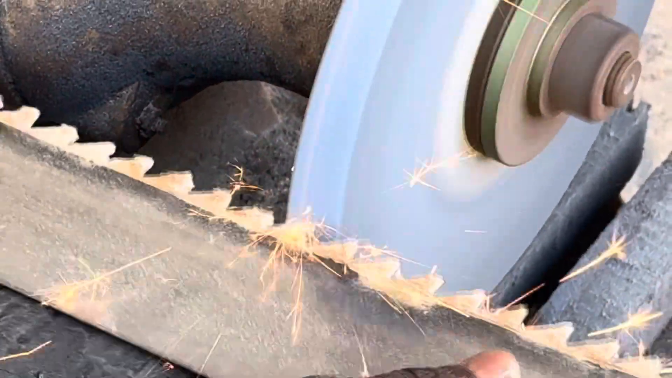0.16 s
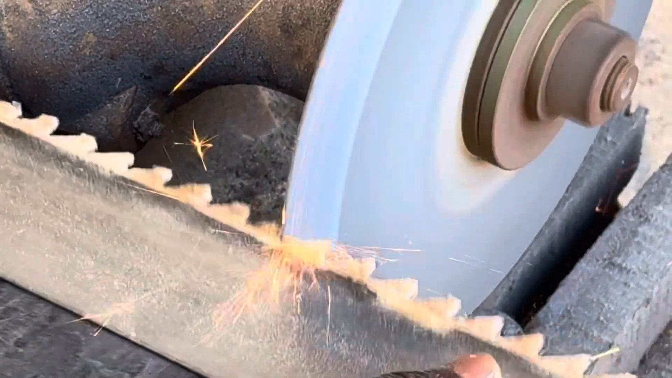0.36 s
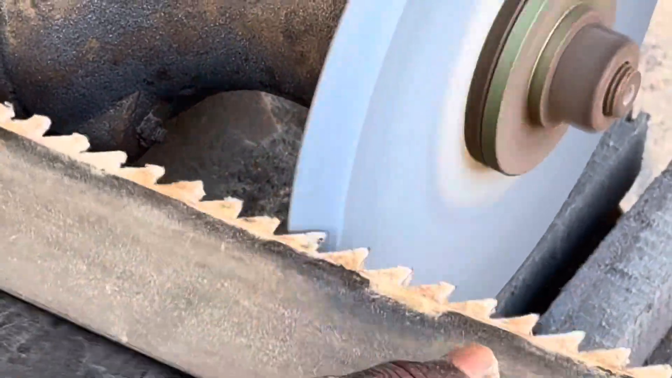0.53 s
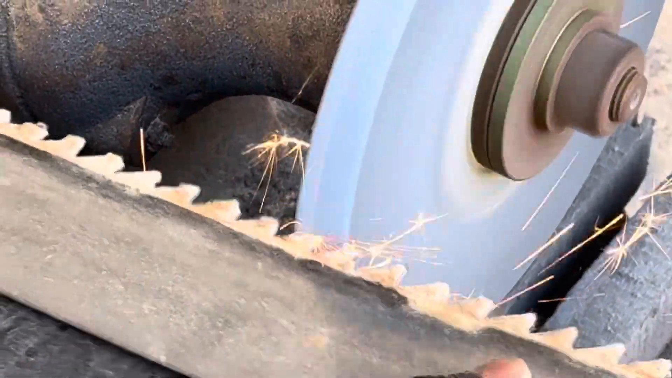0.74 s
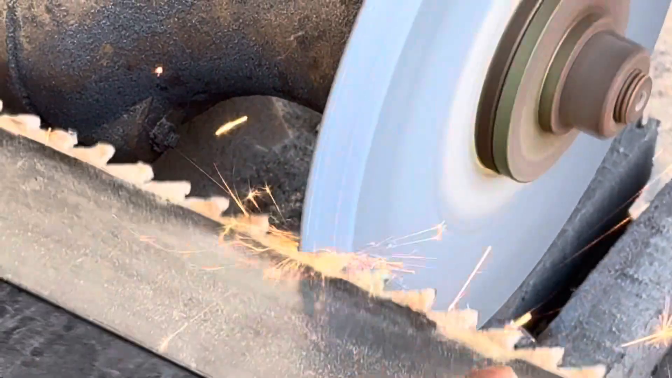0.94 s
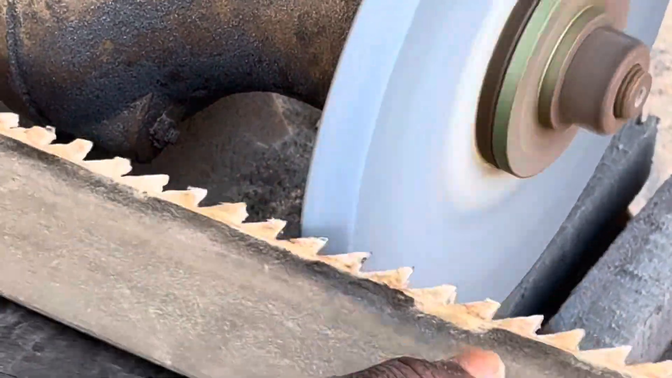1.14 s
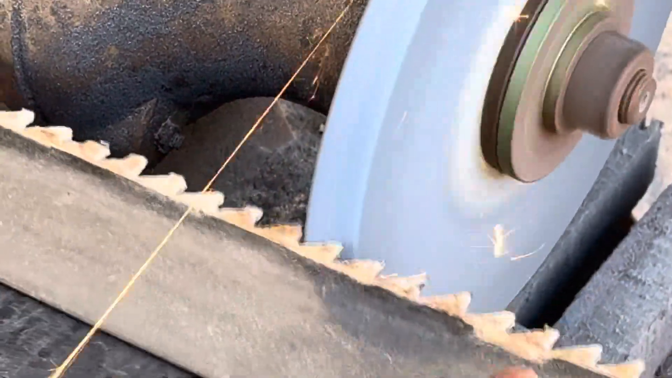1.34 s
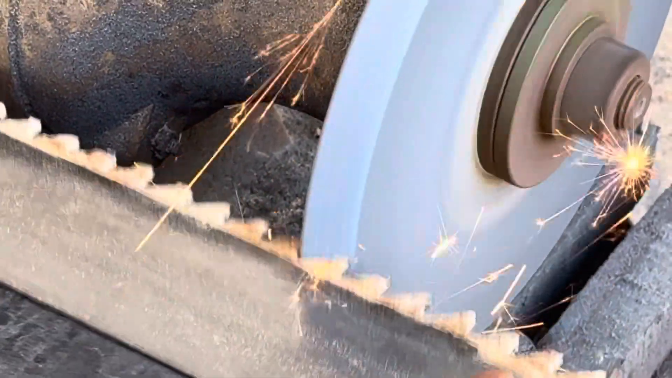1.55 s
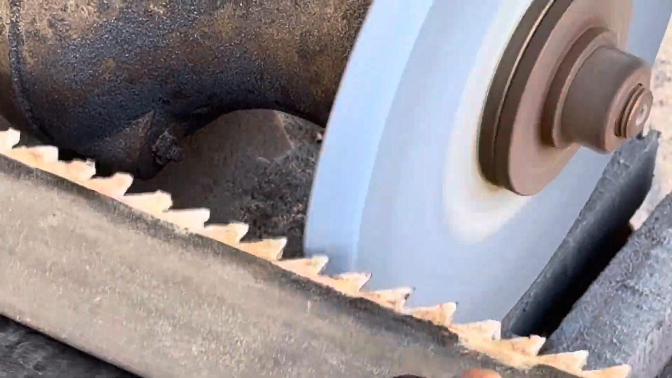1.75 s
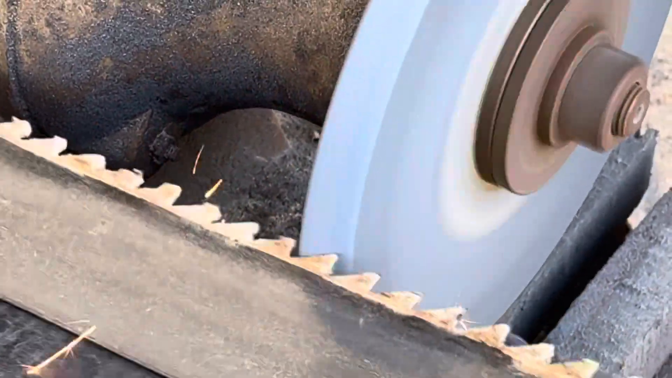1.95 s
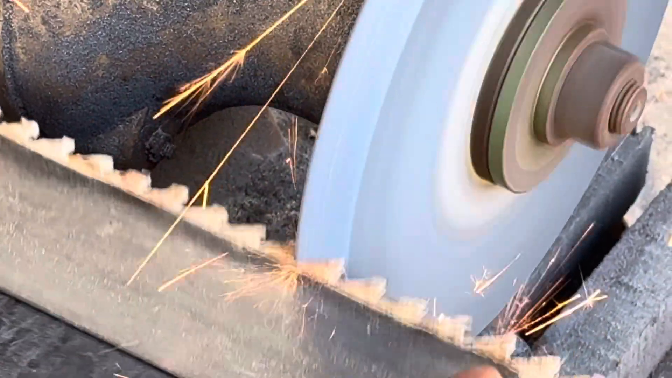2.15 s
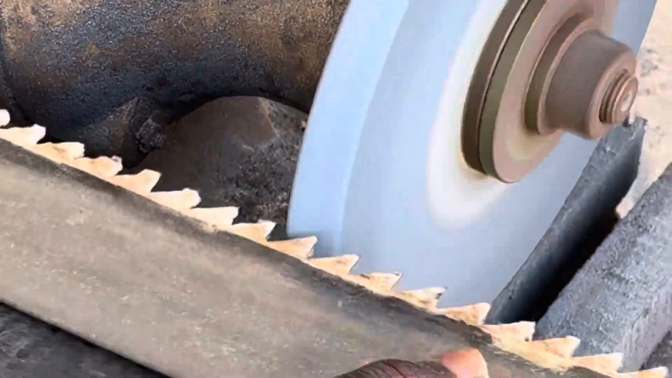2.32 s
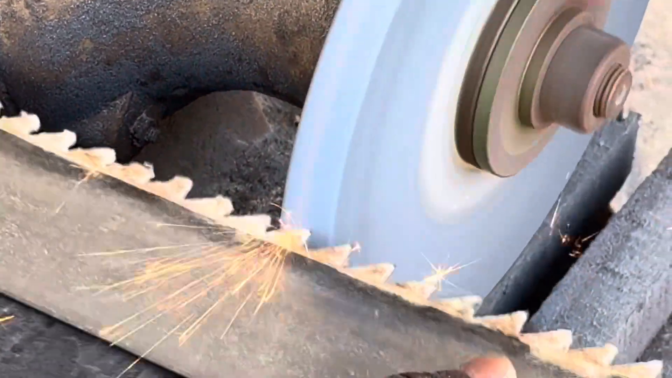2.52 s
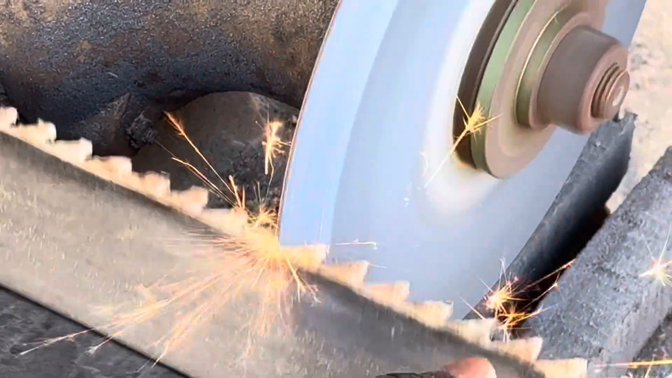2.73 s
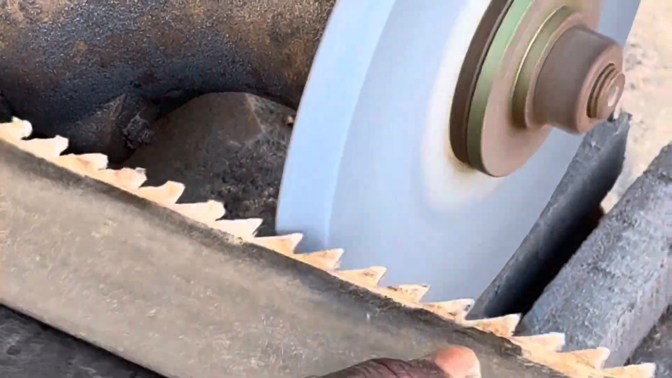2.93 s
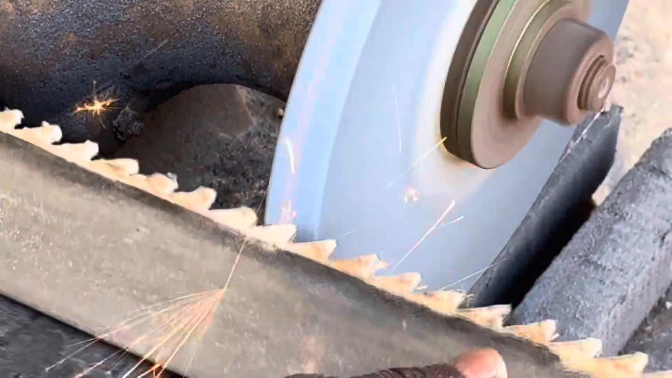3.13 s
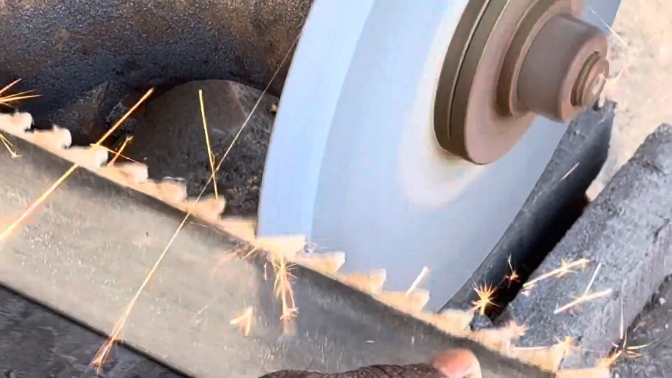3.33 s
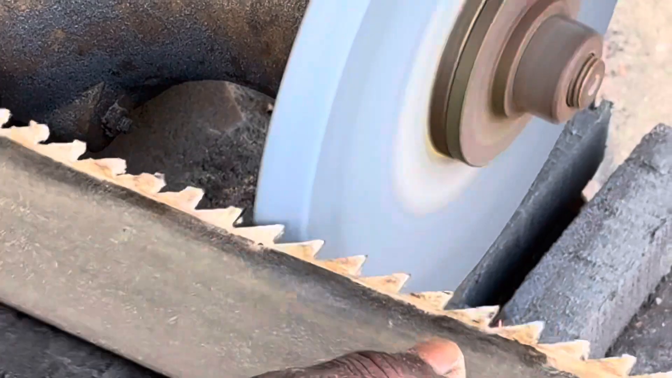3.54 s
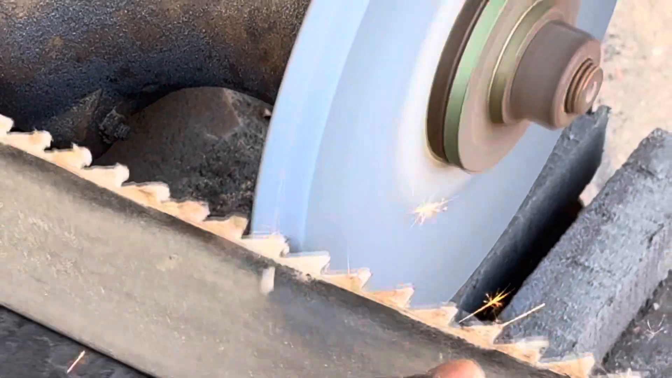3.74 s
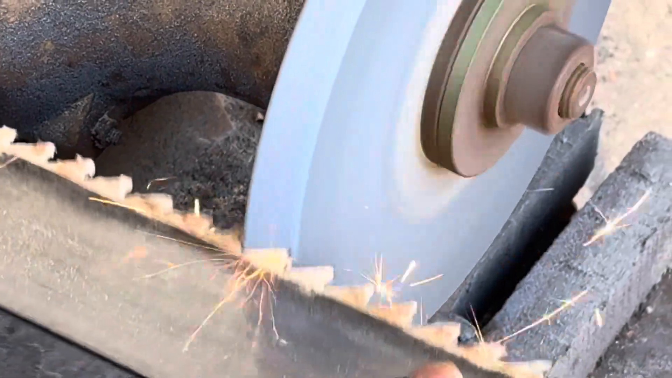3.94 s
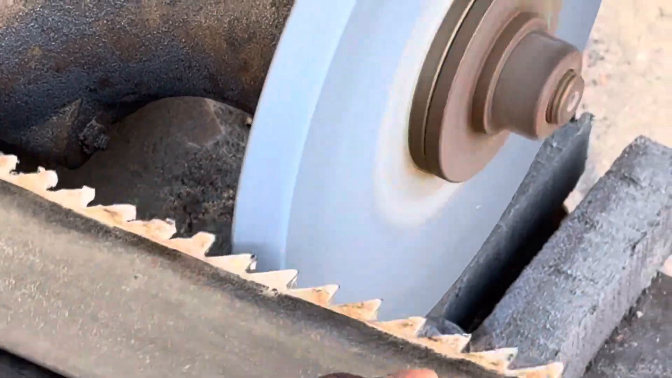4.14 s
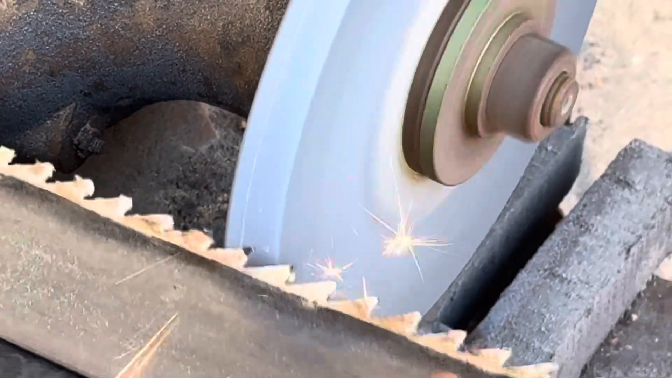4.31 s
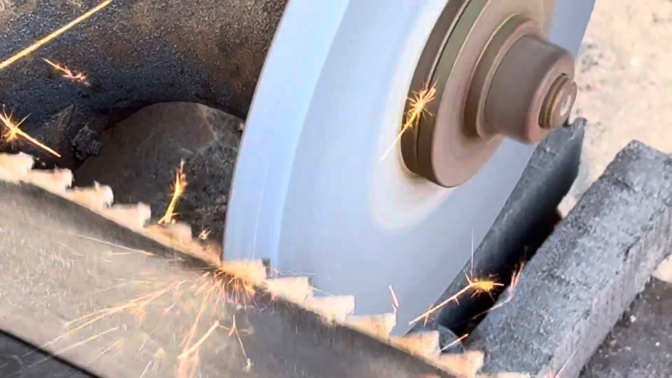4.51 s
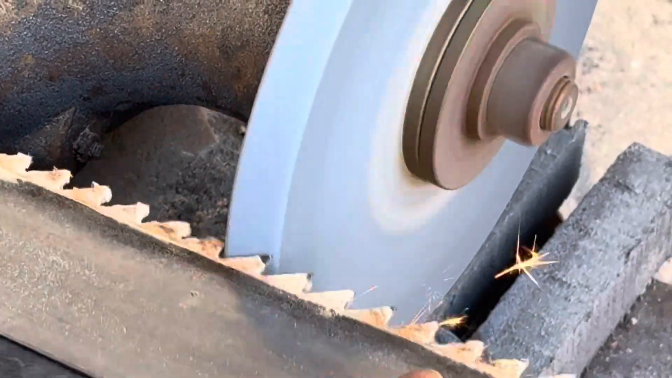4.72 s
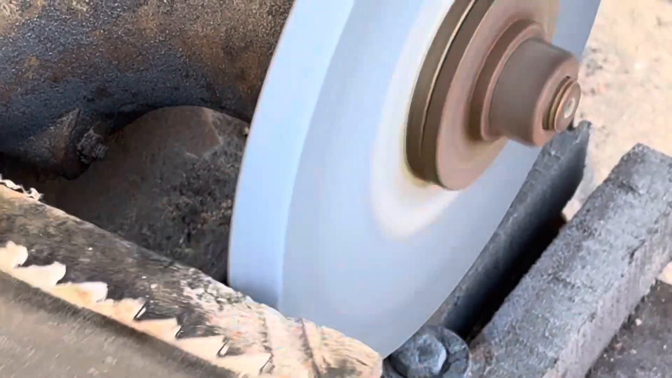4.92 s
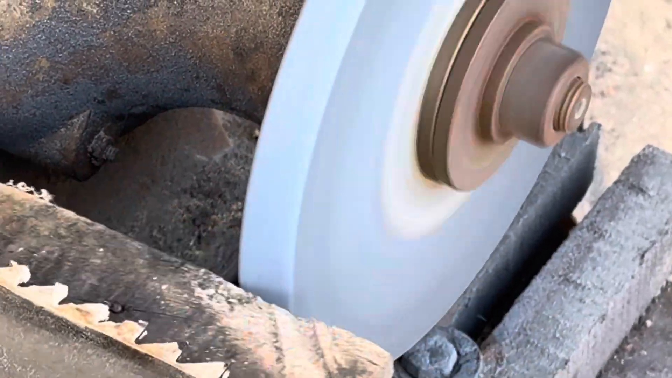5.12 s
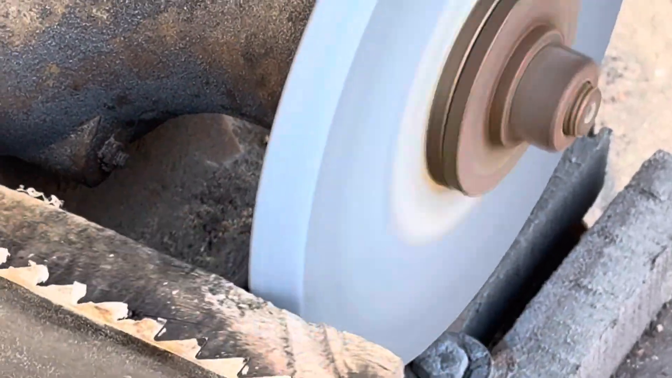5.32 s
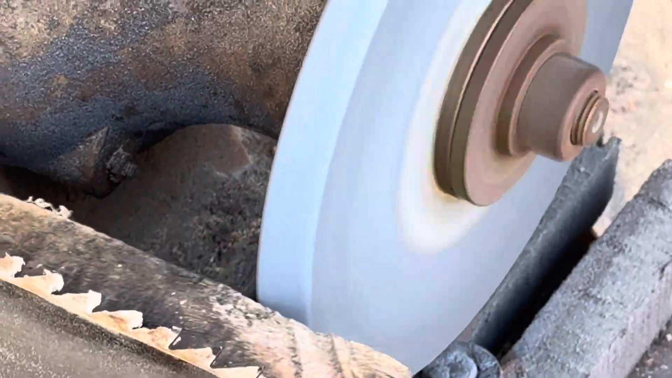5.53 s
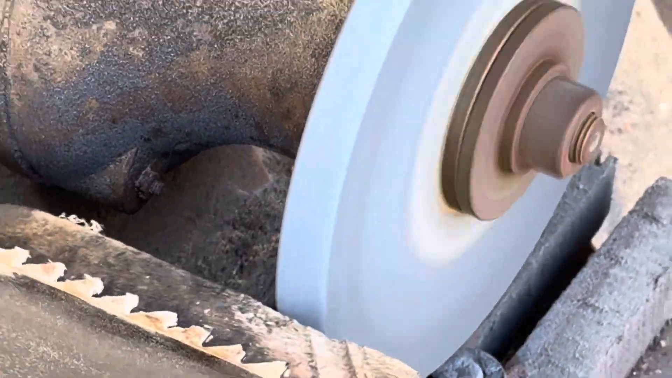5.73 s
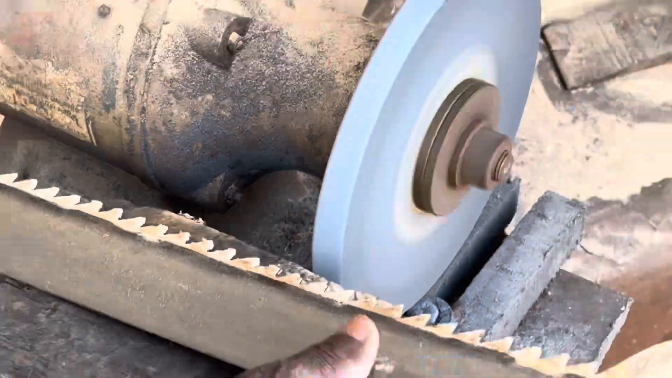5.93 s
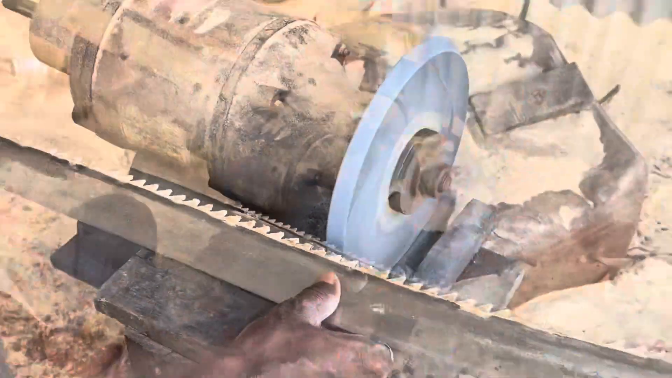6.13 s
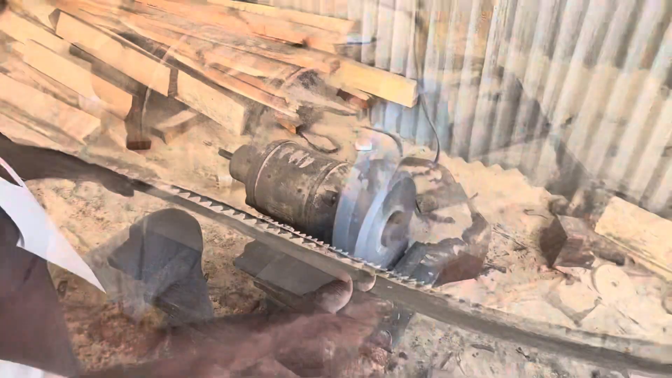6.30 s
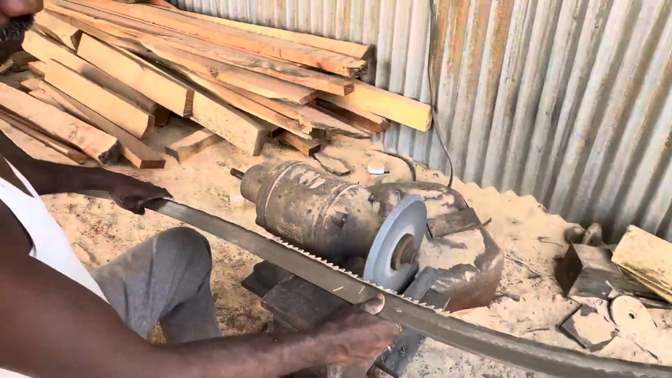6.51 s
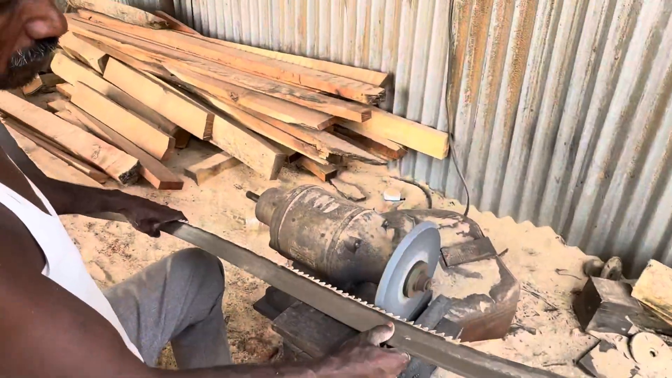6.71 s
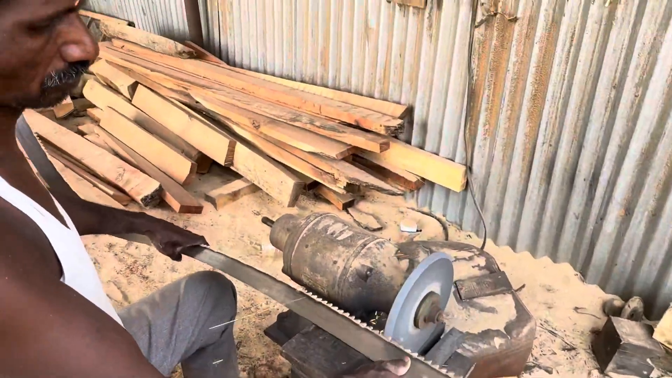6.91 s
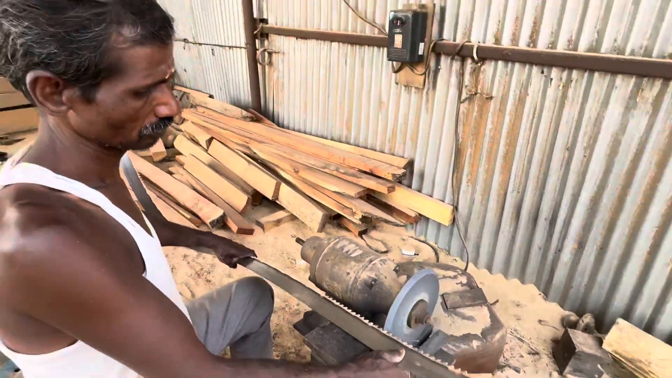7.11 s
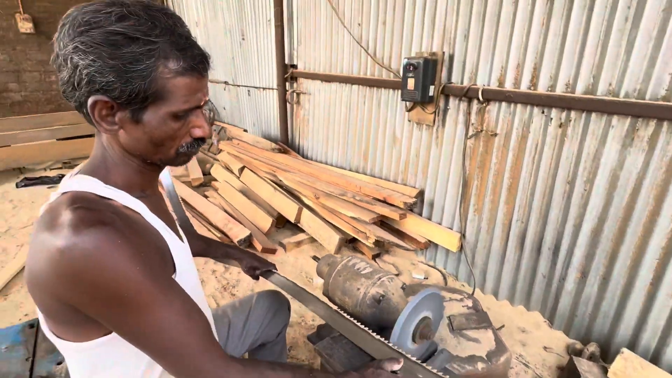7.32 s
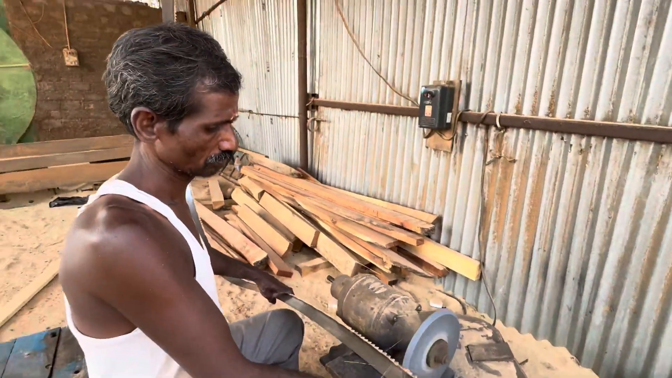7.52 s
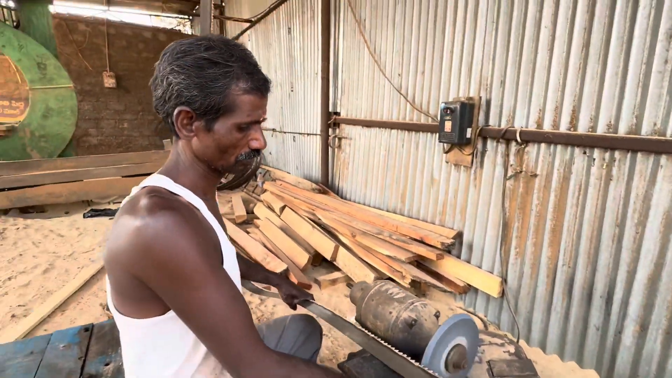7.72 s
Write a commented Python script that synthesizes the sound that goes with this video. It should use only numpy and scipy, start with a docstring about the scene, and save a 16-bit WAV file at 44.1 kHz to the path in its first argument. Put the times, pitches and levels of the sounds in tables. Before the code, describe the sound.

A motor-driven grinding wheel sharpens saw teeth one by one, each buzzing screech ringing the blade, first close, then quicker and distant in a shed.

```python
"""In a shed, a saw blade is sharpened tooth by tooth on a motor-driven grinding wheel.
Close up, eight teeth chatter twice a turn (gated noise), squeal (jittered tones) and ring the blade (modes).
Chirps mark slips of the tooth tip; dispersed cracks and twangs mark snags of the wheel.
The motor idles with hum, whirr and a light rattle, and the idle blade ticks.
Then five quicker strokes are heard from a few steps back, mixed with the shed's echoes."""
import sys
import numpy as np
from scipy import signal
from scipy.fft import rfft, irfft
from scipy.io import wavfile
from scipy.ndimage import uniform_filter1d

SR = 44100
rng = np.random.default_rng(int(sys.argv[2]) if len(sys.argv) > 2 else 0)


def dump(signal):
    """Clip the signal to [-1, 1] and save it as 16-bit WAV at the path in sys.argv[1]."""
    limited = np.clip(np.atleast_2d(signal).T, -1, 1)
    pcm = np.round(limited * 32767).astype(np.int16)
    wavfile.write(sys.argv[1], SR, pcm)


N = 342216
TIME = np.arange(N) / SR
FREQS = np.fft.rfftfreq(N, 1 / SR)


def amp(db):
    """Decibels to gain."""
    return 10 ** (np.asarray(db) / 20)


def unit(x):
    """Scales to rms 1."""
    return x / np.sqrt(np.mean(x ** 2) + 1e-20)


def read(points, hz):
    """Reads a table on a log-frequency axis."""
    f, value = np.transpose(points)
    return np.interp(np.log(hz + 1), np.log(f + 1), value)


def add(mix, start_s, sound):
    """Mixes a sound in at a time."""
    part = mix[max(round(start_s * SR), 0):][:len(sound)]
    part += sound[:len(part)]


def noise():
    """White noise."""
    return rng.standard_normal(N)


def wander(hz):
    """Slow random curve of rms 1, up to a rate."""
    return unit(irfft(rfft(noise()) / (1 + (FREQS / hz) ** 4), N))


def convolve(x, response):
    """Passes a sound through a response scaled to unit energy."""
    return signal.oaconvolve(x, response / np.linalg.norm(response))[:N]


def lag(x, keep):
    """One-pole smoothing."""
    return signal.lfilter([1 - keep], [1, -keep], x)


def butter(x, order, hz, kind):
    """Butterworth filter."""
    return signal.sosfilt(signal.butter(order, hz, kind, fs=SR, output="sos"), x)


def colour(x, spectrum):
    """Causal minimum-phase filter that keeps the power of white noise."""
    hz = abs(np.fft.fftfreq(4096, 1 / SR))
    log_gain = np.log(amp(read(spectrum, hz)))
    response = np.fft.ifft(np.exp(np.conj(signal.hilbert(log_gain)))).real[:2048]
    return convolve(x, response)


def resonate(x, hz, width_hz):
    """A resonance that follows the curve hz and keeps the power of white noise."""
    turn = np.exp(2j * np.pi * np.cumsum(hz * np.ones(N)) / SR)
    r = np.exp(-np.pi * width_hz / SR)
    shifted_down = x / turn + 1e-18
    pole = lag(lag(shifted_down, r), r)
    return (turn * pole).real * np.sqrt(8 / (1 - r))


def modes(x, table):
    """Rings a set of damped modes with random phases."""
    t = TIME[:SR]
    response = np.zeros(SR)
    for hz, db, t60 in table:
        decay = amp(db - 60 * t / t60) / np.sqrt(t60)
        response += decay * np.sin(2 * np.pi * (hz * t + rng.random()))
    return convolve(x, response)


def tail(x, t60s):
    """Countless close modes or echoes, each band dying at its own speed."""
    hz, t, z = signal.stft(rng.standard_normal(SR), SR, nperseg=256)
    t60 = read(t60s, hz)[:, None]
    response = signal.istft(z * amp(-60 * t / t60) / np.sqrt(t60), SR, nperseg=256)[1]
    return convolve(x, response)


def grit(per_s, spread_db, share):
    """Abrasive grains of uneven size cut the steel, over a wash of finer ones."""
    size = amp(spread_db * np.minimum(rng.exponential(1, N), 4))
    grains = (rng.random(N) < per_s / SR) * noise() * size
    return np.sqrt(share) * unit(grains) + np.sqrt(1 - share) * noise()


def patchy(x, depth_db):
    """The contact point wanders, so narrow bands of the scrape swell and fade."""
    z = signal.stft(x, SR, nperseg=1024)[2]
    patches = uniform_filter1d(rng.standard_normal(z.shape), size=4, axis=0)
    patches = unit(uniform_filter1d(patches, size=6, axis=1))
    return signal.istft(z * amp(depth_db * (patches - depth_db / 9)), SR, nperseg=1024)[1][:N]


def flexed(x, flex=.0022):
    """Bending the blade in the hands makes its ringing waver in pitch by the share flex (rms)."""
    bent_time = TIME + flex * np.cumsum(wander(5)) / SR
    return np.interp(bent_time, np.arange(4 * N) / (4 * SR), signal.resample_poly(x, 4, 1))


JOLT_S = 0.01


def contact(strokes, light_db, lean_s, lift_db_per_s):
    """Pressure of all strokes: each tooth lands with a jolt, is leaned in, held and lifted off."""
    pressure = np.zeros(N)
    t = TIME[:SR]
    for touch_s, held_s, db, jolt_db, *_ in strokes:
        landing_db = light_db * np.maximum(1 - t / lean_s, 0) + jolt_db * np.exp(-t / JOLT_S)
        lift_db = lift_db_per_s * np.maximum(t - held_s, 0)
        add(pressure, touch_s, amp(db + landing_db - lift_db))
    return pressure


SHAFT_HZ = 49.0


def high_spots(age_s, width_s, weak_db):
    """Two high spots of the wheel hit the tooth each turn, one harder than the other."""
    beats = 2 * SHAFT_HZ * age_s
    since_s = (beats % 1) / (2 * SHAFT_HZ)
    burst = (since_s / width_s) ** 2 * np.exp(-(since_s / width_s) ** 2)
    uneven_db = 3.5 * np.tanh(wander(60))
    return unit(burst * amp(weak_db * (np.floor(beats) % 2) + uneven_db))


def close_pair(x):
    """A close sound is centred, but its top treble reaches the right side a little earlier."""
    half_turn = np.exp(1j * np.pi * np.maximum(FREQS - 7900, 0) / 3150)
    return irfft(rfft(x) * np.array([1 / half_turn, half_turn]), N)


# left-right likeness of sound that has crossed the shed: freq_hz, correlation
LIKENESS = [(100, .92), (1250, .7), (1750, -.15), (3500, -.3), (6000, 0)]


def spread(a, b, left_db):
    """Two unrelated sounds become a stereo pair, alike in the bass."""
    same = read(LIKENESS, FREQS)
    right = irfft(same * rfft(a) + np.sqrt(1 - same ** 2) * rfft(b), N)
    return np.array([a * amp(left_db / 2), right * amp(-left_db / 2)])


# rasp spectrum: freq_hz, density_db_per_hz
RASP_SPECTRUM = [(40, -51), (300, -5.5), (900, -14), (2200, 13.5), (3800, -5), (4700, 3), (5300, 16),
                 (6300, 0.5), (8800, 0), (9600, 10.5), (11200, 6.5), (13000, 4.5), (14500, 6.5),
                 (15600, 8.5)]


def near_rasp(pressure, age_s, bursts):
    """Grit scrapes the tooth, which bounces on the high spots at first, then beds in."""
    bounce = 0.069 + 0.095 * np.exp(-age_s / 0.028)
    cut = pressure * np.sqrt(1 - bounce + bounce * bursts ** 2) * amp(1.8 * wander(56))
    scrape = patchy(grit(per_s=3000, spread_db=2.5, share=.5), depth_db=3.2)
    bedded = 1 - 0.91 * np.exp(-age_s / 0.036)
    return amp(4.0) * colour(cut * bedded * scrape, RASP_SPECTRUM)


def squeal(hz, jitter_hz):
    """Stick and slip at the tooth tip: a tone whose pitch never holds still."""
    return np.sqrt(2) * np.sin(2 * np.pi * np.cumsum(hz + jitter_hz * wander(443.0)) / SR)


SQUEAL_STOP_DB_PER_S = 75  # from the lift on


def near_squeal(pressure, age_s, held_s, bursts, jolt_db, squeal_db):
    """Chattering tip squeal that sinks in pitch as the contact tightens."""
    # sets in with light pressure, then levels off
    chatter = pressure ** 2 / (pressure ** 2 + amp(-28.0) ** 2)
    stop_db = SQUEAL_STOP_DB_PER_S * np.maximum(age_s - held_s, 0)
    chatter *= amp(squeal_db + jolt_db * np.exp(-age_s / JOLT_S) - stop_db)
    loose = .62 + .38 * np.exp(-age_s / .22)
    knocks = chatter * np.sqrt(1 - loose + loose * bursts ** 2)
    tip_hz = 10280 + 600 * np.exp(-age_s / 0.06) + 60 * wander(13.36)
    tip = amp(-19.5) * squeal(tip_hz, jitter_hz=203.7)
    tip += amp(-25) * resonate(noise(), tip_hz + 300, width_hz=4140)
    tip += amp(-29.5) * np.exp(-age_s / 0.91) * squeal(5280 + 130 * wander(13), jitter_hz=233.7)
    return knocks * tip


# blade modes: freq_hz, level_db, t60_s
BLADE_MODES = [(813, -8, .1), (1037, -1, .07), (1206, -8, .2), (1539, -4.5, .18), (1978, 0, .15),
               (2145, -3, .12), (2205, -5, .2), (2889, -5.5, .3), (3578, -10, .25), (4113, -10, .2),
               (4214, -10, .2), (4944, -9, .12), (7550, -12, .15), (14805, -10, .2)]
# dense ringing spectrum: freq_hz, density_db_per_hz
RING_SPECTRUM = [(25, -8), (55, -14.5), (250, -4), (500, -10), (1000, -5), (1400, -10), (1750, -3.5),
                 (2050, 7), (2500, -4.5), (3300, -12), (5300, -12.5), (7000, -7.5), (15000, -26)]
# blade ringing time: freq_hz, t60_s
RING_T60 = [(60, 0.97), (500, 1), (1100, 0.68), (2100, 0.64), (3500, 0.31), (6000, 0.25), (15000, 0.064)]
BITE_S = 0.095  # until a fresh edge is worn smoother


def near_ring(pressure, age_s, bite_db):
    """Noise from the contact rings the blade; returns centred and sideways sound."""
    # harder pressure shakes the blade more than in proportion
    shake = pressure * (pressure / amp(-30.5)) ** 0.24
    shake *= amp(bite_db * np.exp(-age_s / BITE_S))
    dense = patchy(tail(shake * noise(), RING_T60), depth_db=1.55)
    centre = amp(0.06) * colour(dense, RING_SPECTRUM)
    centre += amp(-4.0) * flexed(modes(shake * noise(), BLADE_MODES))
    # the broad flank radiates middle tones to one side
    sideways = amp(-10) * resonate(tail(shake * noise(), RING_T60), 1020, width_hz=800)
    return centre, sideways


def near_thrum(pressure, age_s, thrum_db):
    """The high spots push the whole blade to and fro."""
    sway = np.sin(4 * np.pi * SHAFT_HZ * age_s + .5 * wander(22))
    return amp(thrum_db + 1.9 * wander(11)) * pressure * sway


# teeth ground close up: touch_s, held_s, pressure_db, touch_jolt_db, squeal_db, thrum_db, bite_ring_db
NEAR_STROKES = [(0.130, 0.38, -29, 1, 3, -14.5, 0.5), (0.738, 0.35, -30.5, 0, 3.5, -32, -2.5),
                (1.332, 0.36, -27, 5, 0, -22, -5.5), (1.932, 0.33, -24, 2, -2, -18, -1),
                (2.542, 0.34, -26.5, 0, -0.5, -19, 1.5), (3.143, 0.33, -28.5, 1, 1.5, -14, 2),
                (3.733, 0.32, -28, 4, 1.5, -12.5, -3), (4.333, 0.38, -28, -1, 2, -16.5, 5.5)]
NEAR_LIGHT_DB, NEAR_LEAN_S, NEAR_LIFT_DB_PER_S = -3, 0.15, 172


def near_grinding():
    """Pressure and high spots of each tooth drive its rasp, squeal, blade ring and thrum."""
    teeth = np.array(NEAR_STROKES)
    current = np.maximum(np.searchsorted(teeth[:, 0], TIME, "right") - 1, 0)
    touch_s, held_s, _, jolt_db, squeal_db, thrum_db, bite_db = teeth[current].T
    age_s = abs(TIME - touch_s)
    pressure = contact(NEAR_STROKES, NEAR_LIGHT_DB, NEAR_LEAN_S, NEAR_LIFT_DB_PER_S)
    bursts = high_spots(age_s, width_s=.0027, weak_db=-2.5)
    ring, sideways = near_ring(pressure, age_s, bite_db)
    centre = near_rasp(pressure, age_s, bursts) + ring
    centre += near_squeal(pressure, age_s, held_s, bursts, jolt_db, squeal_db)
    centre += near_thrum(pressure, age_s, thrum_db)
    return close_pair(centre) + sideways * np.array([[1], [-.4]])


# the tooth tip catches and slips: start_s, tip_chirp_db, low_chirp_db
SLIPS = [(0.2026, -8.5, -31), (0.2313, -7.5, -26), (0.49, -6.5, -27), (0.754, -13.5, -37),
         (0.7739, -11, -38), (2.0441, -23, -14), (3.1944, -12, -21), (3.764, -17, -21), (4.7318, -11, -30)]
SLIP_TIP_HZ, SLIP_LOW_HZ, SLIP_S = 10620, 5325, 0.0012


def slips():
    """Each slip of the tooth tip is a pair of jittered chirps a few milliseconds long."""
    def chirp(hz):
        """A tone with random pitch jitter."""
        return np.sin(2 * np.pi * np.cumsum(hz + 2000 * rng.standard_normal(len(t))) / SR)

    out, t = np.zeros(N), TIME[:1024]
    burst = t / SLIP_S * np.exp(1 - t / SLIP_S)
    for start_s, tip_db, low_db in SLIPS:
        add(out, start_s, burst * (amp(tip_db) * chirp(SLIP_TIP_HZ) + amp(low_db) * chirp(SLIP_LOW_HZ)))
    return close_pair(out)


# the wheel snags on a tooth: start_s, crack_peak_db, twang_peak_db
SNAGS = [(0.2016, -23, -26), (0.23, -28, -25), (0.772, -22, -47), (1.595, -13, -36), (2.103, -12.5, -22.5),
         (2.157, -30, -20), (2.601, -20, -27), (2.774, -15.5, -23.5), (2.858, -25, -20), (3.283, -19, -28)]


def snags(travel_s_at_1hz=.15):
    """Bending waves run along the blade, treble faster than bass: a crack that falls into a twang."""
    hz = np.fft.rfftfreq(4096, 1 / SR)
    travel = np.exp(-4j * np.pi * travel_s_at_1hz * np.sqrt(hz))
    # the bass comes back from the blade's end
    echo = 0.35 * np.exp(-3j * np.pi * travel_s_at_1hz * np.sqrt(hz)) / (1 + (hz / 200) ** 2)
    crack = irfft(travel * hz / (hz + 600) / (1 + (hz / 3500) ** 2))
    twang_band = hz ** 2 / (hz ** 2 + 50 ** 2) / (1 + (hz / 170) ** 2)
    twang = irfft(travel * (1 + echo) * twang_band)
    crack, twang = crack / abs(crack).max(), twang / abs(twang).max()
    out = np.zeros(N)
    for start_s, crack_db, twang_db in SNAGS:
        add(out, start_s, amp(crack_db) * crack + amp(twang_db) * twang)
    return close_pair(out + amp(-11) * tail(out, RING_T60))


# teeth ground further back: touch_s, held_s, pressure_db, touch_jolt_db
FAR_STROKES = [(6.19, 0.17, -29, -8), (6.517, 0.15, -22.5, 3), (6.845, 0.17, -22.5, 2),
               (7.147, 0.21, -23, -4), (7.467, 0.18, -24.5, -2.5)]
# far rasp spectrum: freq_hz, density_db_per_hz
FAR_RASP_SPECTRUM = [(50, -25), (140, -1.5), (450, -1), (950, -5.5), (1600, -3.5), (2300, 2), (3200, -4.5),
                     (3900, 6.5), (4600, 4.5), (5400, -2.5), (6800, -8), (9300, -7), (10800, -3.5),
                     (12300, -5.5)]
# shed ringing time: freq_hz, t60_s
SHED_T60 = [(150, 1), (4000, 0.34), (12000, 0.053)]
# blade tones that carry across the shed: freq_hz, level_db, t60_s
FAR_TONES = [(1982, 1, 0.11), (3050, 4, 0.13), (3770, 3, 0.35), (3830, 9, 0.96), (4010, 3, .25),
             (4215, 3, 0.44), (5860, 2.5, 0.12), (10300, 3, 0.17)]
FAR_LIGHT_DB, FAR_LEAN_S, FAR_LIFT_DB_PER_S = -7.5, 0.064, 299


def far_grinding():
    """Rasp mixes with the shed's echoes; the last teeth squeal more, and the loaded motor drones."""
    pressure = contact(FAR_STROKES, FAR_LIGHT_DB, FAR_LEAN_S, FAR_LIFT_DB_PER_S)
    cut = pressure * (0.87 + 0.34 * high_spots(TIME, width_s=0.0021, weak_db=-7.0))
    cut *= amp(1.2 * wander(25))
    shrill = amp(np.interp(TIME, [6.9, 7.3], [-9, 0]))
    body_hz, tip_hz = 4200 + 220 * wander(28), 10750 + 250 * wander(6.1)
    sides = []
    for tip_db in (-4, -12):
        scrape = patchy(grit(per_s=2500, spread_db=3, share=.4), depth_db=3.2)
        rasp = colour(cut * scrape, FAR_RASP_SPECTRUM)
        echoes = amp(-0.5) * tail(rasp, SHED_T60)
        whine = amp(-0.5) * resonate(cut * noise(), body_hz, width_hz=1660)
        whine += amp(tip_db) * resonate(cut * noise(), tip_hz, width_hz=1300)
        ring = amp(-4.5) * flexed(modes(cut * noise(), FAR_TONES))
        sides.append(amp(-6.5) * rasp + echoes + shrill * whine + np.sqrt(shrill) * ring)
    # the load is felt 50 ms late
    load = abs(np.interp(TIME - .05, TIME, uniform_filter1d(pressure, size=1500)))
    drone = amp(-11.5) * load * np.sin(2 * np.pi * np.cumsum(197 + 1.2 * wander(7.4)) / SR)
    return spread(*sides, left_db=2.5) + drone


IDLE_HZ, SAG_HZ, INERTIA_S = 50.2, 2.6, .25


def shaft_turns():
    """The shaft slows while a tooth is held on the wheel and recovers between teeth."""
    loaded = np.zeros(N)
    for touch_s, held_s, *_ in NEAR_STROKES + FAR_STROKES:
        loaded += (TIME > touch_s) * (TIME < touch_s + held_s)
    sag_hz = SAG_HZ * lag(loaded, np.exp(-1 / (INERTIA_S * SR)))
    return np.cumsum(IDLE_HZ - sag_hz + .35 * wander(4)) / SR


# motor hum: shaft_multiple, mean_level_db_rms
HUM = [(4, -53.5), (5, -50.5), (7, -57.5)]
MAINS_HZ, MAINS_DB = 100.2, -52.5


def motor_hum(turns):
    """Steady mains hum and swelling shaft orders."""
    hum = amp(MAINS_DB) * np.sqrt(2) * np.sin(2 * np.pi * MAINS_HZ * TIME)
    for order, db in HUM:
        swell_db = 1.3 * order * np.tanh(wander(4.5))
        tone = np.sin(2 * np.pi * order * turns + .3 * wander(12))
        hum += amp(db + swell_db) * np.sqrt(2) * tone
    return hum


# wheel whirr spectrum: freq_hz, density_db_per_hz
WHIRR_SPECTRUM = [(20, -37), (50, -6.5), (130, -1.5), (300, 0), (460, -8.5), (1200, -10.5), (3000, -16.5),
                  (5000, -24), (15500, -27)]
# rattle spectrum: freq_hz, density_db_per_hz
RATTLE_SPECTRUM = [(250, -10.5), (700, 8), (950, 2), (1250, 4), (1650, -3), (2200, -3.5), (2900, -2.5),
                   (3800, -11.5), (15000, -17)]
STEP_BACK_S = 6.3


def motor():
    """Hum, the whirr of the wheel and a rattle for about half of every turn, near and then far."""
    turns = shaft_turns()
    hum = motor_hum(turns)
    phase = (turns + .025 * wander(25)) % 1
    beat = np.exp(-phase / .52) / (1 + (phase / .45) ** 10)
    beat = unit(beat * amp(2.4 * np.tanh(wander(22))))
    sides = []
    for _ in range(2):
        whirr = amp(-44.5) * colour(noise() * amp(wander(23)), WHIRR_SPECTRUM)
        rattle = amp(-44.7) * colour(beat * noise(), RATTLE_SPECTRUM)
        sides.append(whirr + rattle)
    # close up only the lower whirr and rattle surround the listener
    around = amp(-12) * butter(sides[1], 2, [60, 1400], "band")
    close = hum + close_pair(sides[0]) + np.array([around, -around])
    # further back: fainter, without the deepest rumble
    distant = amp(-8.0) * butter(hum + spread(*sides, left_db=13.0), 2, 120, "high")
    back = np.interp(TIME, [STEP_BACK_S - .1, STEP_BACK_S + 0.51], [0, 1])
    return np.sqrt(1 - back) * close + np.sqrt(back) * distant


# the idle blade ticks on its rest: start_s, strike_db
TICKS = [(4.9562, -39), (5.0753, -37), (5.2759, -35), (5.3164, -32.5), (5.3383, -35), (5.4167, -41),
         (5.4575, -30)]


def idle_blade():
    """The blade is still ringing from an earlier tooth; later it ticks against its rest."""
    ring = amp(-41) * modes(noise() * amp(-90 * TIME), BLADE_MODES)
    ring += amp(-40.0) * colour(noise() * amp(-60 * TIME), RING_SPECTRUM)
    taps, t = np.zeros(N), TIME[:2048]
    for start_s, db in TICKS:
        add(taps, start_s, amp(db) * np.exp(-t / 0.0096) * rng.standard_normal(len(t)))
    ticks = amp(-1.5) * resonate(taps, 2900, width_hz=960)
    ticks += amp(-12.0) * resonate(taps, 5200, width_hz=1400)
    return close_pair(ring + ticks)


def scene():
    """All sources together."""
    return near_grinding() + slips() + snags() + far_grinding() + motor() + idle_blade()


EDGE_HZ = 15780


def record(dry):
    """The microphone's bass roll-off and the recorder's band limit."""
    lean = butter(dry, 2, 38, "high")
    return signal.oaconvolve(lean, signal.firwin(801, EDGE_HZ, window=("kaiser", 9), fs=SR)[None], "same")


dry = scene()
out = record(dry)
dump(out)
```